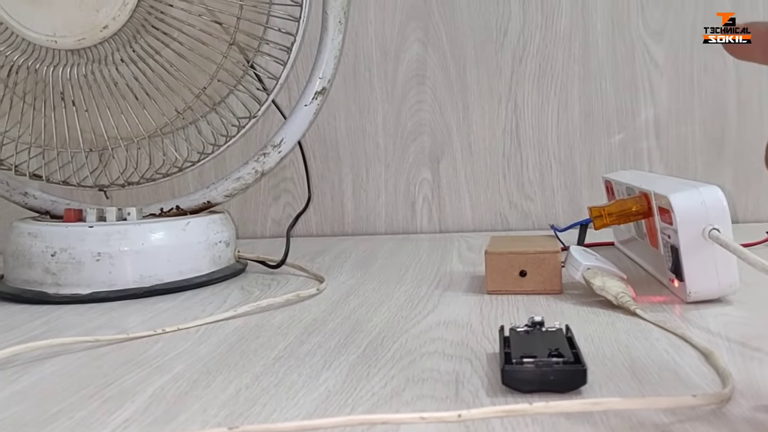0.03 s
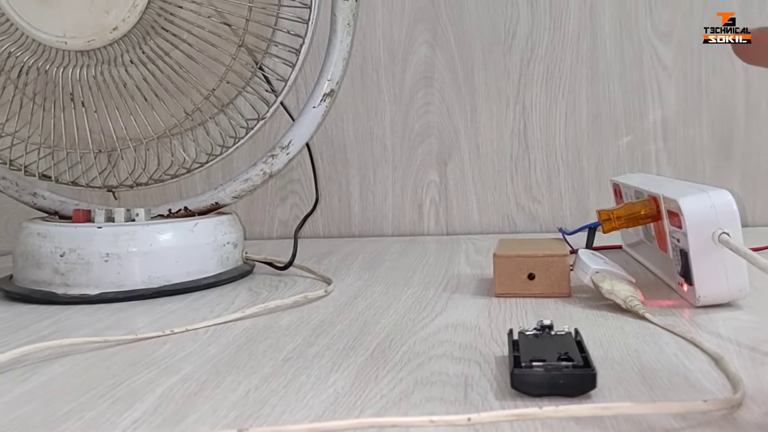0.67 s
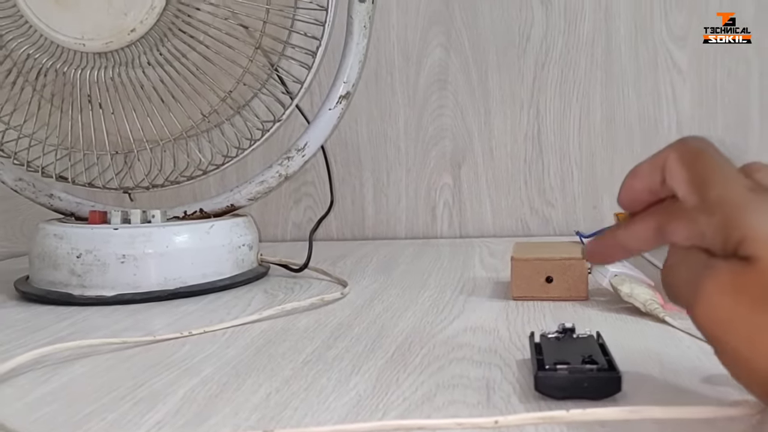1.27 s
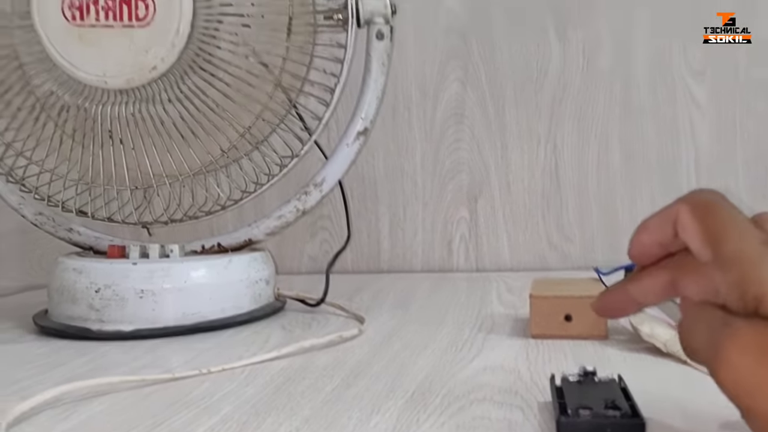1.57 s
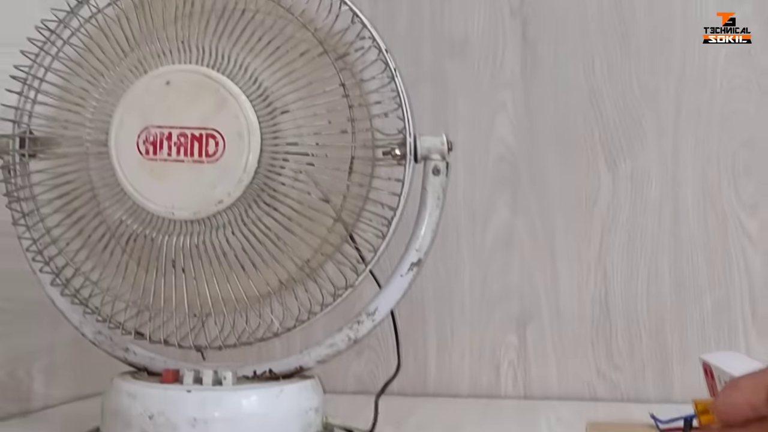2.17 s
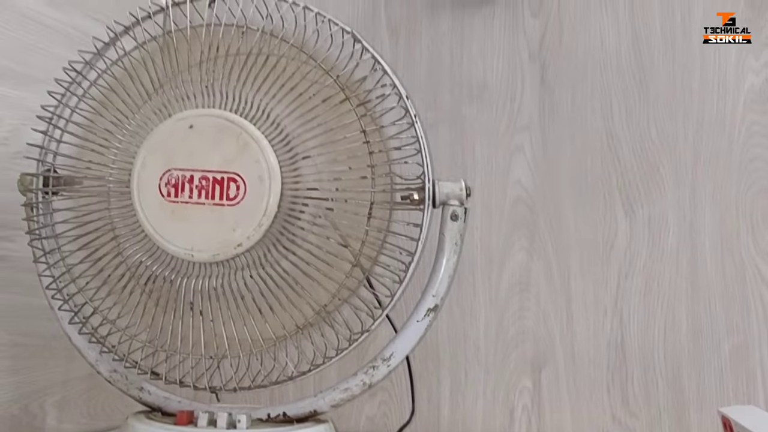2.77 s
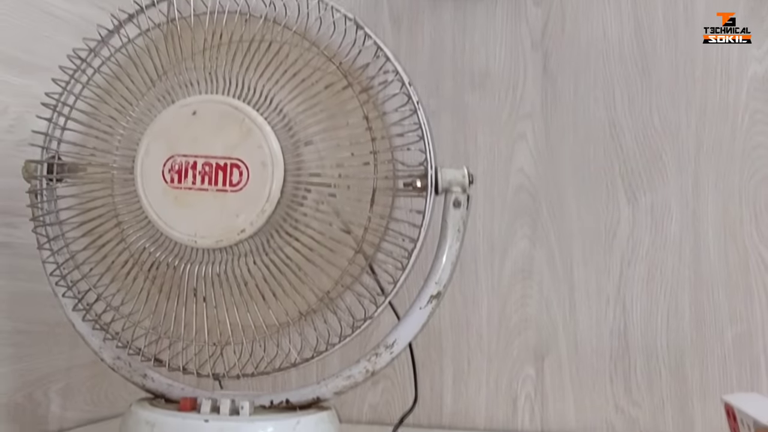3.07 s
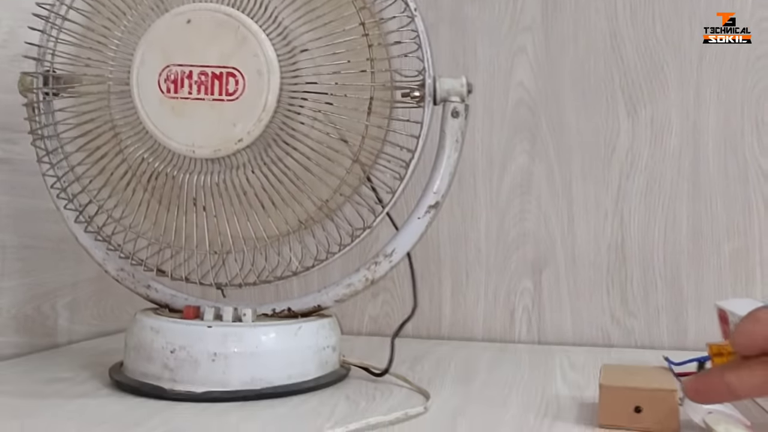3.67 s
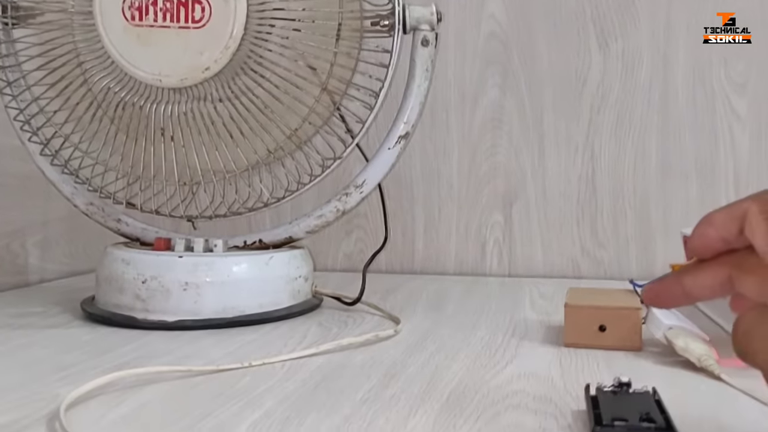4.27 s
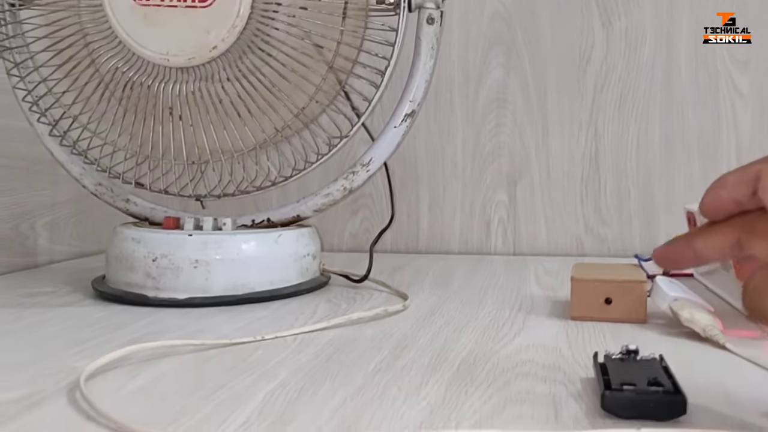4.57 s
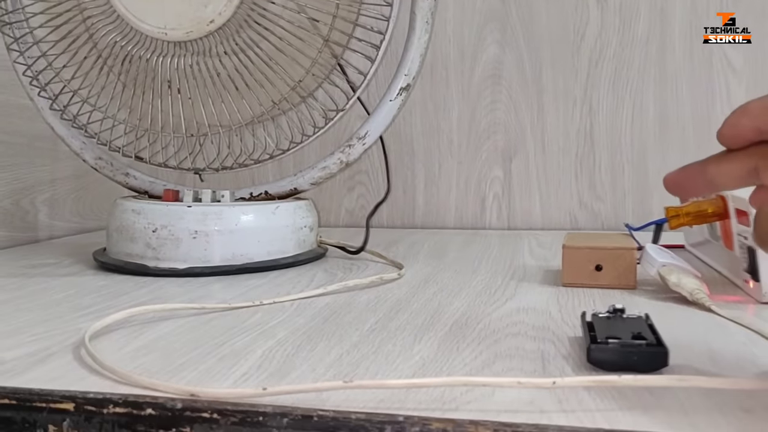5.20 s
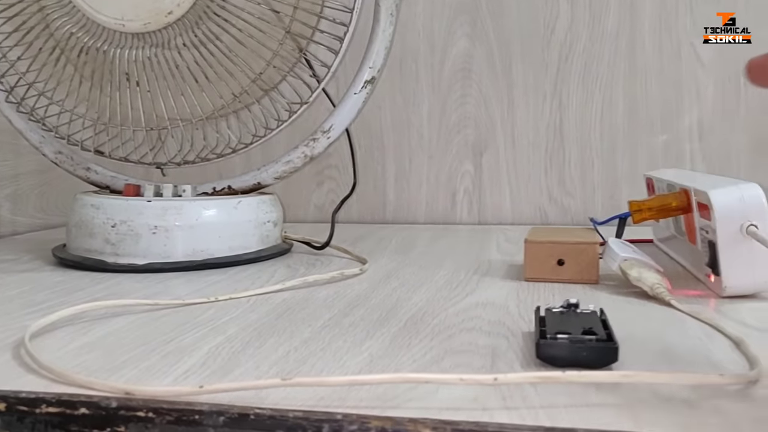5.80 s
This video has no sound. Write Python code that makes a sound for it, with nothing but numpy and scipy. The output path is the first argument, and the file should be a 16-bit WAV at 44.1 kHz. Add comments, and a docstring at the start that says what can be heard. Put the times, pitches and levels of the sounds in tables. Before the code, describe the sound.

A table fan runs at a steady speed indoors and blows straight onto the microphone. A loud, low, fluttering rumble stays constant on the left and comes in gusts on the right, over a softer, even rush of blades. Short puffs, pops and thumps break through all along. The right side is strongest midway and eases near the end as the fan runs on.

```python
"""A table fan runs at steady speed indoors, blowing on the two ports of a stereo microphone.
From the start its draught carries eddies past them, heard as buffeting, constant on the left and gusty
on the right, over the even rush of blades and cage. Bursts of fine turbulence spit and hard eddies thump
throughout. Midway the draught on the right is at its strongest and the hardest eddies strike; a limiter
ducks everything for a moment at each. Towards the end the right side eases while the fan runs on."""
import sys
import numpy as np
from scipy import signal
from scipy.fft import rfft, irfft, next_fast_len
from scipy.io import wavfile
from scipy.ndimage import uniform_filter1d, minimum_filter1d

SR = 44100
rng = np.random.default_rng(int(sys.argv[2]) if len(sys.argv) > 2 else 0)


def file_out(sig):
    """Save sig as 16-bit WAV at sys.argv[1]."""
    # one column per channel
    cols = np.atleast_2d(sig).T
    # limit, then scale
    lim = np.clip(cols, -1, 1)
    pcm = np.round(lim * 32767).astype(np.int16)
    wavfile.write(sys.argv[1], SR, pcm)


N = 266319

# Turbulent pressure at each port at the usual air speed. Each row: frequency in Hz, relative density in dB.
EDDY_SPECTRUM_LEFT = [(8, -10.5), (40, 0.8), (90, 0), (150, 1.5), (260, -2.5), (420, -7), (600, -17.5),
                      (850, -25.5), (1200, -46), (2000, -58.5), (4000, -81)]
EDDY_SPECTRUM_RIGHT = [(8, -4), (40, -11.5), (105, 2.5), (160, -1.5), (250, -7), (400, -15.5), (600, -30.5),
                       (850, -38), (1500, -59.5), (4000, -97)]
# The stream slips off the left port. Each row: centre in seconds, depth in dB, half width in seconds.
LULLS_LEFT = [(0.083, 4.5, 0.0069), (0.228, 4.5, 0.025), (0.392, 3.5, 0.0068), (0.477, 7.5, 0.01),
              (0.591, 4, 0.0071), (0.664, 4.5, 0.014), (0.766, 8.0, 0.0086), (0.832, 7.0, 0.015),
              (0.881, 5.5, 0.0098), (1.146, 4.0, 0.0069), (1.57, 6.0, 0.005), (1.621, 4.5, 0.012),
              (1.764, 4.0, 0.0097), (2.057, 8.0, 0.011), (2.119, 5.5, 0.01), (2.206, 8.0, 0.025),
              (2.371, 5.5, 0.019), (2.671, 4.5, 0.0052), (2.73, 8.5, 0.011), (2.769, 5.5, 0.004),
              (2.99, 4.5, 0.0098), (3.127, 4.0, 0.011), (3.222, 4.0, 0.012), (3.296, 5.0, 0.0062),
              (3.516, 5.0, 0.013), (3.7, 7.5, 0.0097), (3.958, 5.0, 0.00725), (4.105, 5, 0.011),
              (4.146, 8.0, 0.015), (4.382, 3.5, 0.011), (4.423, 5.0, 0.009), (4.548, 6.5, 0.016),
              (4.658, 3.5, 0.0085), (4.683, 6.5, 0.0081), (4.913, 5.0, 0.0059), (5.026, 4.5, 0.0088),
              (5.245, 6.5, 0.0081), (5.305, 4.0, 0.011), (5.47, 3.5, 0.0076), (5.655, 3.5, 0.01),
              (5.863, 5, 0.0078), (5.971, 9.0, 0.012)]
# The stream hits the left port squarely. Each row: centre in seconds, rise in dB.
SWELLS_LEFT = [(0.317, 2.5), (0.905, 3.5), (1.207, 3.0), (1.381, 2), (1.487, 3.5), (1.863, 3.5),
               (2.147, 2.5), (2.274, 2.5), (2.403, 2.5), (2.51, 2.5), (2.81, 2.5), (2.868, 4), (3.08, 2.5),
               (3.166, 3.0), (3.321, 3.0), (3.382, 3.5), (3.568, 1), (3.647, 4), (3.752, 2.5), (3.844, 3.0),
               (4.217, 3.0), (4.774, 2.5), (4.831, 2), (5.331, 3.0), (5.51, 1.5), (5.802, 2.5)]
# Draught on the right port, at the edge of the stream. Each row: time in seconds, relative level in dB.
DRAUGHT_RIGHT = [(0.0, -27), (1.2, -23), (1.5, -16), (1.9, -17), (2.02, -31), (2.11, -15), (2.7, -14),
                 (2.95, -13), (3.05, -9), (3.2, -10), (3.45, -13), (3.9, -11), (4.1, -14), (4.48, -21),
                 (4.56, -28.5), (4.65, -18), (5.3, -17), (5.72, -13), (5.85, -24), (6.04, -27)]
# Gusts swing over onto the right port. Each row: centre in seconds, relative level in dB.
GUSTS_RIGHT = [(0.219, -12), (0.306, -4.5), (0.455, -15), (0.91, -10), (1.072, -7), (1.33, -9), (1.757, -8),
               (2.198, -7), (2.335, -7.5), (2.441, -5.5), (2.621, -14), (2.795, -6), (3.63, -9),
               (4.177, -6.5), (4.432, -6), (4.791, -6.5), (4.894, -8), (5.111, -11.5), (5.304, -7),
               (6.019, -10.5)]
# Single hard eddies; wide ones thump, narrow ones pop. Each row: moment of deepest suction in seconds,
# peak before limiting in dB, half width in seconds, port (0 left, 1 right).
HARD_EDDIES = [(0.091, 0.5, 0.0023, 0), (0.165, -6, 0.00033, 0), (0.276, -4, 0.0023, 0),
               (0.321, 2.5, 0.00071, 0), (0.915, 1.5, 0.0016, 0), (1.058, -18, 0.00028, 0),
               (1.204, -8, 0.0055, 0), (1.477, 3.5, .0012, 0), (1.939, -3, 0.0013, 1),
               (2.018, 3.5, 0.001, 0), (2.764, 6.5, 0.0013, 1), (2.875, -6, 0.00025, 0),
               (3.286, 5, 0.00083, 1), (3.377, 6, 0.0012, 0), (3.6, 5.5, .0012, 1), (3.765, 4, 0.0014, 1),
               (4.045, 5.5, 0.00091, 0), (4.521, 3, 0.0015, 0), (4.735, 4.5, 0.00098, 0),
               (4.835, 1.5, 0.00068, 0), (4.858, -0.5, 0.00026, 0), (4.89, 4.5, 0.00085, 0),
               (4.974, 1, 0.0006, 0), (5.155, 4.5, 0.00088, 0), (5.306, 5, 0.0016, 1),
               (5.796, 4, 0.0008, 0)]
# The loudest bursts of small, fast eddies. Each row: centre in seconds, relative level in dB,
# speed as a multiple of the usual, nominal half width in seconds, port (0 left, 1 right).
PUFFS = [(0.041, -5.5, 0.95, 0.0036, 0), (0.062, -13, 0.95, 0.007, 0), (0.15, -14.5, 1.1, 0.0057, 0),
         (0.178, -12, 1.0, 0.0037, 0), (0.218, -12.5, 0.95, 0.0043, 1), (0.275, -7.5, 0.95, 0.0088, 0),
         (0.317, -10, 1.05, 0.0062, 0), (0.365, -13.0, 0.95, 0.0066, 0), (0.418, -12, 1.0, 0.0079, 0),
         (0.614, -16.5, 1.05, 0.0076, 0), (0.687, -13, 1.05, 0.0026, 0), (0.79, -19.5, 1.15, 0.006, 0),
         (0.905, -10.5, 0.95, 0.0028, 0), (0.977, -18, 1.0, 0.0058, 0), (1.011, -10, 1.3, 0.0027, 0),
         (1.058, -16.5, 1.35, 0.006, 0), (1.126, -12.0, 1.2, 0.0027, 0), (1.232, -11.5, 1.0, 0.012, 0),
         (1.269, -18, 1.15, 0.0038, 0), (1.335, -11, 1.05, 0.003, 0), (1.357, -13, 1.05, 0.0053, 0),
         (1.409, -12, 1.1, 0.0025, 0), (1.493, -11, 1.0, 0.0044, 0), (1.657, -11, 1.0, 0.0048, 0),
         (1.693, -8, 0.95, 0.0039, 0), (1.845, -17, 0.95, 0.0033, 0), (1.871, -13.5, 1.0, 0.006, 0),
         (1.986, -23, 1.05, 0.0053, 0), (2.017, -14.5, 1.1, 0.0046, 0), (2.192, -6.5, 0.95, 0.003, 1),
         (2.263, -17, 1.2, 0.0042, 0), (2.334, -9.5, 1.1, 0.006, 0), (2.44, -8, 1.15, 0.0051, 0),
         (2.451, -10, 1.0, 0.002, 1), (2.509, -7, 1.0, 0.0059, 0), (2.649, -12.5, 0.95, 0.011, 0),
         (2.808, -10, 1.1, 0.0044, 0), (2.875, -8, 1.15, 0.0038, 0), (2.955, -9, 0.95, 0.0048, 0),
         (3.014, -19.5, 0.95, 0.012, 0), (3.037, -15, 1.05, 0.0033, 0), (3.046, -13, 0.95, 0.0029, 1),
         (3.071, -16, 1.2, 0.0081, 0), (3.096, -15, 0.95, 0.0067, 0), (3.153, -16.5, 1.05, 0.0053, 0),
         (3.218, -16, 0.95, 0.0039, 1), (3.323, -5, 1.0, 0.0037, 0), (3.383, -9, 1.2, 0.003, 0),
         (3.416, -6.5, 0.95, 0.0052, 0), (3.44, -17, 1.15, 0.0087, 0), (3.458, -12.5, 1.15, 0.0033, 0),
         (3.548, -16.5, 0.95, 0.004, 1), (3.573, -10.5, 1.0, 0.014, 0), (3.671, -11, 1.05, 0.0058, 0),
         (3.727, -10, 1.05, 0.0027, 0), (3.753, -7, 0.95, 0.0045, 0), (3.825, -5.5, 1.1, 0.0077, 0),
         (3.852, -21, 1.0, 0.0089, 0), (4.046, -14.5, 1.1, 0.0044, 0), (4.072, -13, 1.3, 0.01, 0),
         (4.238, -16, 1.05, 0.0092, 0), (4.279, -8.5, 1.05, 0.0029, 0), (4.36, -14, 0.95, 0.0082, 0),
         (4.442, -10, 1.0, 0.0039, 1), (4.449, -15.5, 1.1, 0.0068, 0), (4.483, -14, 1.1, 0.0043, 0),
         (4.596, -14, 0.95, 0.0076, 0), (4.727, -13, 1.05, 0.0057, 0), (4.833, -12, 0.95, 0.013, 0),
         (4.884, -11, 1.1, 0.0099, 0), (4.949, -15, 1.0, 0.01, 0), (4.977, -15.5, 1.1, 0.0065, 0),
         (5.06, -10.5, 1.1, 0.015, 0), (5.147, -9.5, 1.1, 0.0048, 0), (5.163, -2.5, 0.95, 0.003, 0),
         (5.2, -7.5, 1.0, 0.012, 0), (5.265, -11, 1.0, 0.0028, 0), (5.331, -14, 1.0, 0.0042, 0),
         (5.367, -15.5, 1.0, 0.011, 0), (5.412, -12, 1.0, 0.0089, 0), (5.44, -12.5, 1.35, 0.004, 0),
         (5.571, -8.5, 1.1, 0.004, 0), (5.607, -13, 1.15, 0.0066, 0), (5.733, -8.5, 1.3, 0.0027, 0),
         (5.8, -12, 1.1, 0.01, 0), (5.883, -18, 1.2, 0.0059, 0), (5.909, -13.5, 1.15, 0.0061, 0),
         (5.943, -13.5, 1.2, 0.005, 0), (6.006, -14.5, 1.1, 0.01, 0)]
# Such a burst at the usual speed. Each row: frequency in Hz, relative density in dB.
PUFF_SPECTRUM = [(100, -21), (350, 5.5), (550, 3.5), (800, -3.5), (1100, -20), (1600, -31.5), (3000, -66),
                 (6000, -94.5)]
# Blade rush at each port; the left inlet rings near 8.4 kHz, the right near 6.6 kHz.
# Each row: frequency in Hz, relative density in dB.
RUSH_SPECTRUM_LEFT = [(50, 3), (350, 2), (600, -14.5), (950, -2.5), (1400, -6), (2300, -11), (3300, -18.5),
                      (4200, -22.5), (5200, -28.5), (6300, -31.5), (7300, -27), (8400, -23.5), (10000, -31),
                      (13000, -37.5), (15000, -43)]
RUSH_SPECTRUM_RIGHT = [(50, -0.5), (350, 2.5), (600, -9.5), (950, -5), (1400, -10.5), (2300, -16),
                       (3300, -21), (5400, -25), (6650, -20), (7400, -26), (8600, -35), (10000, -37),
                       (13000, -40.5), (15000, -48.5)]
# Resonances of cage and housing. Each row: centre in Hz, width in Hz, left gain in dB, right gain in dB.
CAGE_RESONANCES = [(980, 200, 1.5, 1.5), (1664, 130, 1.5, 2.5), (1900, 98, -2, -2), (2170, 120, 2.3, 3.5),
                   (2380, 92, 2, 2.5), (2800, 100, 1, 3.5)]
# Likeness of the rush in the two ports. Each row: frequency in Hz, coherence from 0 to 1.
RUSH_COHERENCE = [(100, 1), (1000, 0.68), (1350, 0), (1650, 0.57), (1900, .05), (2300, 0.19), (2700, 0.03),
                  (5000, 0)]
# The rush swells briefly within the first second. Each row: time in seconds, gain in dB.
RUSH_GAIN = [(0.0, 0), (0.6, 0.1), (0.85, 2), (1.1, -0.3), (1.6, 0.3), (2.6, -0.15), (3.15, 0), (3.4, -0.1),
             (3.9, -0.07), (6.04, -0.4)]
# Faint dry ticks. Each row: centre in seconds, left level in dB, right level in dB.
TICKS = [(2.015, -30.5, -46), (2.757, -29, -30), (4.728, -36, -43), (5.148, -35, -47), (5.304, -50, -42)]
# Colour of a tick. Each row: frequency in Hz, relative density in dB.
TICK_SPECTRUM = [(300, 0), (1500, 6), (3000, 3), (5000, -2), (7000, -8), (15000, -22)]


def buffet(level_db, spectrum, usual_db, headroom_db, flutter_db, speed_power, surge, trim_db):
    """Frozen turbulence: a fixed pattern of eddies passes a port, so faster air is louder and higher."""
    swirl = unit(np.tanh(0.7144 * flutter(low_hz=20.84, high_hz=56.94)))  # quick, bounded surges
    excess_db = np.minimum(level_db - usual_db, headroom_db)  # the stream has a top speed
    speed = from_db(excess_db) ** speed_power * np.exp(surge * swirl)
    pattern = coloured_noise(spectrum, size=2 ** 19)
    pressure = np.interp(np.cumsum(speed), np.arange(len(pattern)), pattern, period=len(pattern))
    return from_db(level_db + flutter_db * swirl + trim_db) * pressure


def draught_left(steady_db, swell_half_width_s):
    """Pressure follows the flow: the left level in dB falls as the stream slips off, rises as it hits."""
    lulls_db = sum(depth_db * bump(s, half_width_s) for s, depth_db, half_width_s in LULLS_LEFT)
    swells_db = sum(rise_db * bump(s, swell_half_width_s) for s, rise_db in SWELLS_LEFT)
    return steady_db - lulls_db + swells_db


def draught_right(gust_half_width_s):
    """Incoherent sources add in power: gusts and a weaker draught give the right level in dB."""
    draught_power = from_db(over_time(DRAUGHT_RIGHT)) ** 2
    gust_power = sum((from_db(db) * bump(s, gust_half_width_s)) ** 2 for s, db in GUSTS_RIGHT)
    return 10 * np.log10(draught_power + gust_power)


def flapping(rms_db, skew, low_hz, high_hz):
    """A jet flaps at random across a port: the level in dB dips further than it rises."""
    band = signal.butter(2, [low_hz, high_hz], "bandpass", fs=SR, output="sos")
    swing = unit(signal.sosfilt(band, rng.standard_normal(N + SR))[SR:])
    return rms_db * unit(1 - np.exp(-skew * np.clip(swing, -2.2, 2.2)))


def hard_eddies(turbulence, core_half_widths, core_limit_s):
    """A vortex crosses a port as a suck, then a push; its smooth core displaces the finer turbulence."""
    out, t = turbulence.copy(), np.arange(N) / SR
    for s, db, half_width_s, port in HARD_EDDIES:
        near = abs(t - s) < 10 * half_width_s
        position = (t[near] - s) / half_width_s - 1  # in half widths from the core's centre
        core_radius = min(core_half_widths, core_limit_s / half_width_s)
        out[port, near] *= 1 - np.exp(-(position / core_radius) ** 4)
        out[port, near] += from_db(db) * position * np.exp((1 - position ** 2) / 2)
    return out


def puffs(stretch, trim_db):
    """Frequency scales with flow speed: the faster a knot of fine eddies passes, the brighter it spits."""
    out = np.zeros((2, N))
    strays = stray_puffs(per_s=2.7, mean_db=-17.5, spread_db=0.5, right_share=0.2, half_width_s=0.0036)
    for s, db, speed, half_width_s, port in PUFFS + strays:
        spectrum = [(hz * speed, level) for hz, level in PUFF_SPECTRUM]
        add_centred(out[port], s, from_db(db + trim_db) * burst(spectrum, stretch * half_width_s))
    return out


def stray_puffs(per_s, mean_db, spread_db, right_share, half_width_s):
    """A Poisson process: weaker bursts arrive independently at the usual speed, as rows like PUFFS."""
    wait, strength, side = rng.random((60, 3)).T
    times = np.cumsum(-np.log(1 - wait)) / per_s
    levels_db = mean_db + spread_db * (2 * strength - 1)
    ports = (side < right_share).astype(int)
    return [(s, db, 1, half_width_s, port) for s, db, port in zip(times, levels_db, ports) if s < N / SR]


def port_overload(pressure, knee_db, window_samples):
    """Soft saturation: each port gives way for the milliseconds in which the turbulence is too strong."""
    peak = -minimum_filter1d(-abs(pressure), 2 * window_samples)
    load = smoothed(peak, window_samples) / from_db(knee_db)
    return pressure / (1 + load ** 8) ** (1 / 8)


def fan_rush(left_db, right_db, waver_db):
    """Air torn by the blades is broadband noise, coloured by the cage, partly coherent at the ports."""
    size = next_fast_len(N)
    hz = np.fft.rfftfreq(size, 1 / SR)
    shared, independent = rfft(rng.standard_normal((2, size)))
    coherence = over_hz(RUSH_COHERENCE, hz)
    blended = coherence * shared + np.sqrt(1 - coherence ** 2) * independent
    cage_db = sum(np.outer(port_db, np.exp(-((hz - centre) / width) ** 2))
                  for centre, width, *port_db in CAGE_RESONANCES)
    left = irfft(shared * from_db(over_hz(RUSH_SPECTRUM_LEFT, hz) + cage_db[0]), size)[:N]
    right = irfft(blended * from_db(over_hz(RUSH_SPECTRUM_RIGHT, hz) + cage_db[1]), size)[:N]
    ports = [unit(shifting_bands(x, rms_db=2.3, patch_s=0.18, patch_hz=140)) for x in (left, right)]
    gain_db = over_time(RUSH_GAIN) + waver_db * flutter(low_hz=4, high_hz=40)
    return np.array(ports) * from_db([[left_db], [right_db]]) * from_db(gain_db)


def shifting_bands(x, rms_db, patch_s, patch_hz):
    """Amplitude modulation by band: narrow parts of the rush swell and fade, each on its own."""
    frame, hop = 2048, 512
    spectra = signal.stft(x, nperseg=frame, noverlap=frame - hop)[2]
    rate_hz = np.fft.fftfreq(spectra.shape[1], hop / SR)
    ripple_per_hz = np.fft.fftfreq(spectra.shape[0], SR / frame)
    blur = np.exp(-(rate_hz[:, None] * patch_s) ** 2 - (ripple_per_hz * patch_hz) ** 2)
    patches = unit(np.fft.ifft2(np.fft.fft2(rng.standard_normal(blur.shape)) * blur).real)
    return signal.istft(spectra * from_db(rms_db * patches.T), nperseg=frame, noverlap=frame - hop)[1][:N]


def ticks(half_width_s):
    """Very brief broadband noise is heard as a click, here just ahead of a few of the hardest eddies."""
    out = np.zeros((2, N))
    for s, *port_db in TICKS:
        for channel, db in zip(out, port_db):
            add_centred(channel, s, from_db(db) * burst(TICK_SPECTRUM, half_width_s))
    return out


def burst(spectrum, half_width_s):
    """A Gaussian envelope makes noise swell and die, with rms 1 at its top."""
    noise = coloured_noise(spectrum, size=4096)
    t = (np.arange(len(noise)) - len(noise) / 2) / SR
    bell = np.exp(-.5 * (t / half_width_s) ** 2)
    return unit(noise * bell) * np.sqrt(np.mean(bell ** 2))


def coloured_noise(spectrum, size):
    """Filtering gives white noise the stated spectrum, at rms 1."""
    gain = from_db(over_hz(spectrum, np.fft.rfftfreq(size, 1 / SR)))
    return unit(irfft(rfft(rng.standard_normal(size)) * gain, size))


def flutter(low_hz, high_hz):
    """Band-limited noise wavers between two rates, at rms 1."""
    size = next_fast_len(N)
    hz = np.fft.rfftfreq(size, 1 / SR)
    band = hz / np.hypot(hz, low_hz) / (1 + (hz / high_hz) ** 2)
    return unit(irfft(rfft(rng.standard_normal(size)) * band, size)[:N])


def bump(s, half_width_s):
    """A Gaussian bell of height 1 around a moment, at every sample."""
    return np.exp(-.5 * np.minimum(((np.arange(N) / SR - s) / half_width_s) ** 2, 100))


def add_centred(mix, s, sound):
    """Superposition: a sound adds to the mix, centred on a moment."""
    start = round(s * SR) - len(sound) // 2
    part = mix[max(start, 0):max(start + len(sound), 0)]
    part += sound[max(-start, 0):][:len(part)]


def over_hz(points, hz):
    """Interpolation of a table on a log-frequency axis."""
    table_hz, value = np.transpose(points)
    return np.interp(np.log(hz + 1), np.log(table_hz + 1), value)


def over_time(points):
    """Linear interpolation of a table at every sample."""
    return np.interp(np.arange(N) / SR, *np.transpose(points))


def smoothed(x, window_samples):
    """Two moving averages make a triangular low-pass window."""
    return uniform_filter1d(uniform_filter1d(x, window_samples), window_samples)


def from_db(db):
    """Amplitude grows tenfold for every 20 dB."""
    return 10 ** (np.asarray(db) / 20)


def unit(x):
    """Normalisation to rms 1."""
    return x / np.sqrt(np.mean(x ** 2) + 1e-20)


def scene():
    """Pressures superpose: each port has its own turbulence, and both hear the fan."""
    left_db = draught_left(steady_db=-9, swell_half_width_s=0.014)
    left_db += flapping(rms_db=1.06, skew=0.7, low_hz=11.91, high_hz=25.92)
    right_db = draught_right(gust_half_width_s=0.022)
    right_db += flapping(rms_db=1.7, skew=0.45, low_hz=8.7, high_hz=20.05)
    left = buffet(left_db, EDDY_SPECTRUM_LEFT, usual_db=-9.5, headroom_db=1.1748,
                  flutter_db=2, speed_power=0.36, surge=0.14, trim_db=0.2)
    right = buffet(right_db, EDDY_SPECTRUM_RIGHT, usual_db=-14, headroom_db=7,
                   flutter_db=3, speed_power=0.28, surge=0.14, trim_db=-1.3)
    turbulence = np.array([left, right]) + puffs(stretch=0.96, trim_db=-0.6)
    saturated = port_overload(turbulence, knee_db=0.5, window_samples=50)
    wind = hard_eddies(saturated, core_half_widths=1.93, core_limit_s=0.0028)
    rush = fan_rush(left_db=-35, right_db=-33, waver_db=0.84)
    return wind + rush + ticks(half_width_s=0.00078)


def limiter(x, ceiling_db, recovery_db_per_s, window_samples):
    """Peak limiting: one gain for both channels drops just ahead of each overshoot, then recovers."""
    over_db = np.maximum(20 * np.log10(abs(x).max(0) + 1e-9) - ceiling_db, 0)
    ramp_db = np.arange(N) / SR * recovery_db_per_s
    gain_db = ramp_db - np.maximum.accumulate(over_db + ramp_db)
    ahead_db = minimum_filter1d(gain_db, 2 * window_samples)
    return x * from_db(smoothed(ahead_db, window_samples))


def record(dry):
    """Finite range and bandwidth: a limiter holds the peaks, then a low-pass cuts the highest treble."""
    held = limiter(dry, ceiling_db=-0.15, recovery_db_per_s=48, window_samples=60)
    low_pass = signal.firwin(401, cutoff=15000, window=("kaiser", 9), fs=SR)
    return signal.oaconvolve(held, low_pass[None], "same")


dry = scene()
out = record(dry)
file_out(out)
```